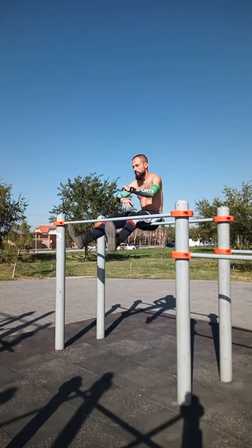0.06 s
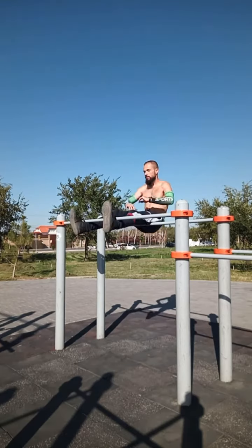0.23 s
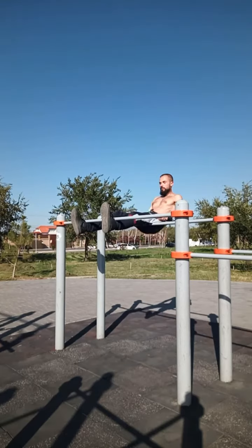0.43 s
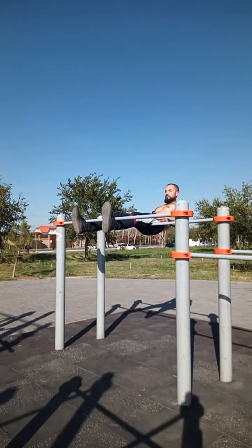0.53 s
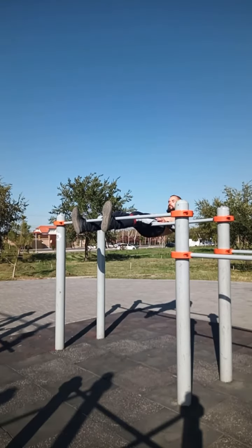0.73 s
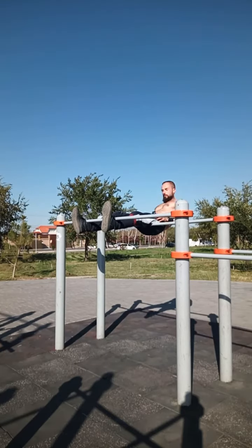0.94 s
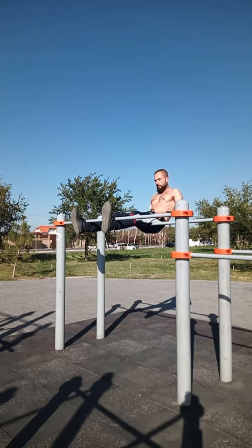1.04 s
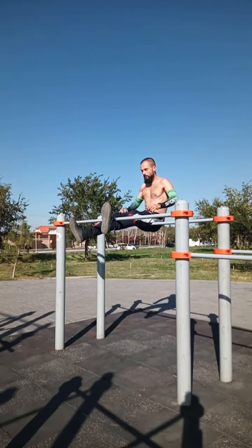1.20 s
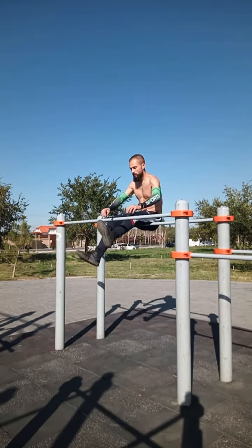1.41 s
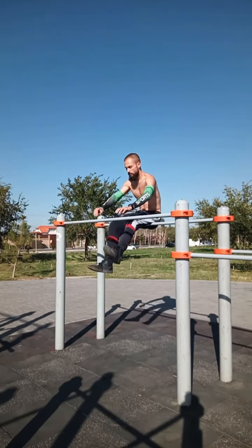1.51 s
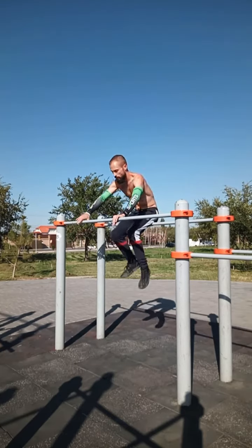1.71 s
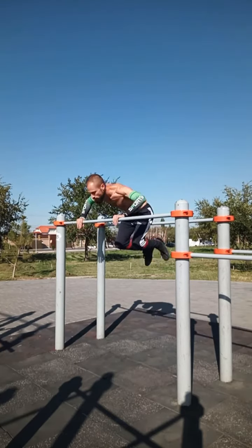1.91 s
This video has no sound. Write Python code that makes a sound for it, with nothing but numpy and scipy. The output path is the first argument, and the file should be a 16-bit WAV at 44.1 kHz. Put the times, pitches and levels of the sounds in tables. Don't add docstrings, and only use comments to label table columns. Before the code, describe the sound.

Hollow steel exercise bars knock and rattle in their clamps at about 0.23 seconds, a duller deeper knock answers at 0.3, and the loudest clank hits at 0.36, ringing and humming away within half a second. Then near quiet: faint distant traffic hiss and a low, uneven engine throb. Tiny metal ticks come around 1.65-1.72, then a soft bright clink with a weaker bounce at 1.82. Dry, open outdoor phone sound.

```python
import sys
import numpy as np
from scipy import signal
from scipy.fft import rfft, irfft, next_fast_len
from scipy.io import wavfile
from scipy.ndimage import uniform_filter1d, map_coordinates

SR = 44100
rng = np.random.default_rng(int(sys.argv[2]) if len(sys.argv) > 2 else 0)


def makeup_ratio(level_db):
    decades = np.asarray(level_db, float) / 20
    return 10 ** decades


def to_wav(sig):
    pcm = np.clip(np.atleast_2d(sig), -1, 1) * 32767
    pcm = np.round(pcm).astype(np.int16)
    wavfile.write(sys.argv[1], SR, pcm.T)


N = 85995
T = np.arange(N) / SR
RING_RISE_S, WAVER = 0.0035, 1


def unit(x):
    return x / np.sqrt(np.mean(x ** 2) + 1e-20)


def along(points, hz):
    f, v = np.transpose(points)
    return np.interp(np.log(hz + 1), np.log(f + 1), v)


def wobble(rate, count=N):
    knots = rng.standard_normal(int(count * 400 / SR) + 4)
    return map_coordinates(knots, [T[:count] * min(rate, 400)])


def filtered(x, response):
    m = next_fast_len(N + 8192)
    gain = response(np.fft.rfftfreq(m, 1 / SR))
    return irfft(rfft(x, m) * gain, m)[..., :N]


def swell(t, rise):
    return (1 - np.exp(-t / rise)) ** 2


def ring(start, hz, db, t60, rise, waver, rate=60):
    t, out = T[:SR // 2], np.zeros(N + SR)
    loose = waver * min(hz / 2500, 1.3)
    shake = loose * wobble(rate, count=len(t))
    turn = rng.random(2)
    second_hz = hz * (1 - 0.00416 * (0.5 + turn[1]))
    pair = np.sin(2 * np.pi * (hz * t + turn[0]) + shake)
    pair = pair + 0.35 * np.sin(2 * np.pi * (second_hz * t + turn[0]))
    level_db = db - 60 * t / t60 + 2.8 * loose * wobble(rate / 2, count=len(t))
    out[round(start * SR):][:len(t)] = makeup_ratio(level_db) * swell(t, rise) * pair
    return out[:N]


def traffic():
    # (frequency [Hz], level [dB])
    traffic_colour = [(25, -15), (60, 1), (120, 6), (350, -10.5), (900, -7.5), (2200, -13.5), (4000, -24),
                      (15000, -28.5)]
    # (time [s], level [dB])
    flow = [(0, -55.5), (.15, -58.5), (.6, -58), (.9, -58.5), (1.3, -56.5), (1.6, -56.5), (1.95, -57.5)]
    z = signal.stft(rng.standard_normal(N + 512), nperseg=512)[2]
    patches = uniform_filter1d(rng.standard_normal(z.shape), 5, 0)
    patches = uniform_filter1d(patches, 8, 1)
    noise = signal.istft(z * makeup_ratio(2.05 * unit(patches)), nperseg=512)[1][:N]
    hiss = unit(filtered(noise, lambda hz: makeup_ratio(along(traffic_colour, hz))))
    return makeup_ratio(np.interp(T, *np.transpose(flow))) * hiss


def engine():
    # (time [s], level [dB])
    throb = [(0.0, -50), (0.342, -69.5), (0.362, -57), (0.476, -64.5), (0.532, -54.5), (0.58, -69.5),
             (0.732, -54.5), (0.76, -73), (1.02, -45.5), (1.058, -60), (1.194, -54.5), (1.216, -63),
             (1.286, -49.5), (1.65, -65), (1.814, -45), (1.878, -68), (1.922, -56), (1.95, -62)]
    firing_hz, width_hz = 79, 17
    pitch = firing_hz + 3 * wobble(5.1)
    tone = np.sqrt(2) * np.sin(2 * np.pi * np.cumsum(pitch) / SR)
    noise = rng.standard_normal(N)
    rough = unit(filtered(noise, lambda hz: np.exp(-((hz - firing_hz) / width_hz) ** 2)))
    return makeup_ratio(np.interp(T, *np.transpose(throb))) * (0.7 * tone + 0.43 * rough)


def fitting():
    # (time [s], peak level [dB], pitch [Hz], time to fade by 60 dB [s])
    ticks = [(1.7196, -48, 5600, .003), (1.7222, -51, 5900, .003), (1.645, -62, 13000, .004),
             (1.8775, -59, 6000, .009), (1.8800, -58, 6100, .009), (1.882, -68, 6500, .04),
             (1.724, -71, 6600, .08)]
    # (time [s], level [dB], rise [s], time to fade by 60 dB [s])
    clinks = [
        (1.8225, -47.5, 0.0048, 0.06),
        (1.838, -54.5, 0.0039, 0.044),
    ]
    # (frequency [Hz], level [dB], share of the clink's fading time)
    part_tones = [(6016, 0.5, 1.4), (7230, 20, 0.48), (7600, 9.5, 1.5), (8340, 17.5, 1), (9790, 17.5, .8),
                  (10890, 14, 0.68), (11600, 16, 0.78), (14700, 3, .9), (15500, 1, .9)]
    # (frequency [Hz], level [dB])
    jingle = [(3500, -22), (5500, -12), (7000, -9), (10000, 3), (12500, -3), (13500, -17), (14300, -10),
              (16000, -4)]
    out = sum(ring(s, hz, db, t60, 0.00012, 0) for s, db, hz, t60 in ticks)
    for s, db, rise, t60 in clinks:
        t = np.clip(T - s, 0, None)
        hiss = unit(filtered(rng.standard_normal(N), lambda hz: makeup_ratio(along(jingle, hz))))
        out = out + makeup_ratio(db + 15.5 - 60 * t / t60) * swell(t, rise) * hiss
        out = out + sum(ring(s, hz, db + tone_db, t60 * share, rise, 0.6, rate=180)
                        for hz, tone_db, share in part_tones)
    return out


def frame(start, colour):
    t, out = T[:SR // 4], np.zeros(N + SR)
    place, turn, size, life = rng.random((4, 260, 1))
    hz = 450 + 11000 * place ** 1.9
    t60 = 0.19 * (0.71 + 0.72 * life)
    fading = makeup_ratio(7.25 * size - 4.5 - 60 * t / t60)
    crowd = colour(hz) * fading * np.sin(2 * np.pi * (hz * t + turn))
    out[round(start * SR):][:len(t)] = crowd.sum(axis=0) * (1 - np.exp(-t / RING_RISE_S))
    return out[:N]


def knock(start, db, length, which, tilt_db, post_db):
    # (frequency [Hz], level [dB])
    chatter_colour = [(250, -35), (520, -1), (800, -4), (1400, 0.5), (3000, 0), (6000, -5), (9000, -8),
                      (15000, -21)]
    # (frequency [Hz], level [dB], time to fade by 60 dB [s])
    bar_tones = [
        [(1084, 2, 0.11), (3000, -8, .1), (3360, -5, .08), (1021, -13, 0.79), (1490, -8, 0.2),
         (2350, -5.5, 0.29), (2496, -5.5, 0.17), (3690, 3, 0.11), (4010, -6, 0.12), (4640, -16, 0.065),
         (6060, -2, 0.086), (6240, -2, 0.12)],
        [(812, -16.5, 0.51), (1031, -9.5, 0.35), (1125, -6, 0.23), (1537, -4.5, 0.17), (1940, -12, 0.45),
         (2105, -10, 0.37), (2274, -9.5, 0.5), (2436, -6.5, 0.21), (3675, -22, .5), (3830, -17, 0.45),
         (4150, -18.5, 0.31), (6040, -12.5, 0.26), (6244, -11, 0.22)],
        [(558.5, 7.5, 0.15), (1040, 0, 0.29), (1770, 3, 0.073), (1950, 4, .07), (2283, -2, 0.45),
         (6140, -10, 0.45)],
        [],
    ]

    def colour(hz):
        return makeup_ratio(along(chatter_colour, hz) + tilt_db * np.log2(hz / 1000 + 0.086))

    t = np.clip(T - start, 0, None)
    hits_per_s, spiky_db = 8000, 1.5
    hits = (rng.random(N) < hits_per_s / SR) * rng.standard_normal(N) * makeup_ratio(spiky_db * wobble(300))
    held = swell(t, 0.0041) * np.exp(-np.clip(t - length / 2, 0, None) / 0.011)
    chatter = held * unit(filtered(hits, colour))
    bar = sum(ring(start, hz, tone_db, t60, RING_RISE_S, WAVER) for hz, tone_db, t60 in bar_tones[which])
    post = ring(start + 0.02, 320, post_db + 11, 0.18, 0.0081, WAVER)
    return makeup_ratio(db) * (chatter + bar + makeup_ratio(-18) * frame(start, colour)) + post


def bars():
    # (time [s], level [dB], chatter length [s], bar number, tilt [dB per octave])
    knocks = [
        (0.2301, -37, 0.027, 0, 1),
        (.300, -47.5, 0.095, 2, -9),
        (.305, -61.5, 0.02, 3, 6),
        (0.3623, -30.5, 0.029, 1, -0.17),
    ]
    post_hum = [-45.5, -60.5, -80, -47]
    # (frequency [Hz], level [dB], time to fade by 60 dB [s])
    rail_tones = [(1210, -6, 0.28), (1966, -24.5, 0.64), (2030, -18, 0.78), (3700, -18.5, 0.55),
                  (5800, -11, 0.23), (2600, -19, 0.085), (2963, -2, 0.052), (4690, -34, 0.97),
                  (5470, -17, 0.15), (5800, -4, 0.042)]
    # (time [s], pitch [Hz], level [dB], time to fade by 60 dB [s])
    thumps = [(.2305, 400, -41, .07), (.243, 510, -41, 0.11), (.244, 580, -41, 0.14),
              (.240, 786, -39.5, 0.16), (.3600, 560, -24, .06), (.385, 575, -44, .2),
              (.369, 1800, -32, 0.08), (0.33, 1940, -28, .05)]
    start, db = knocks[-1][:2]
    rail = sum(ring(start, hz, db + tone_db, t60, RING_RISE_S, WAVER) for hz, tone_db, t60 in rail_tones)
    thumping = sum(ring(s, hz, thump_db, t60, RING_RISE_S, WAVER) for s, hz, thump_db, t60 in thumps)
    knocking = sum(knock(s, knock_db, length, round(bar), tilt_db, post_db)
                   for (s, knock_db, length, bar, tilt_db), post_db in zip(knocks, post_hum))
    return rail + thumping + knocking


def scene():
    return (traffic() + engine() + fitting() + bars())[None]


def top_cut(x):
    return signal.sosfilt(signal.butter(12, 15990, fs=SR, output="sos"), x)


def record(dry):
    # (frequency [Hz], level [dB])
    mic = [(5000, 1), (6500, 3.5), (7300, -10), (8600, -22.5), (10700, -15), (13000, -22.5), (15300, -8),
           (15800, -7)]
    mix = filtered(dry, lambda hz: makeup_ratio(along(mic, hz)) * (hz < 15850))
    return top_cut(mix)


dry = scene()
out = record(dry)
to_wav(out)
```